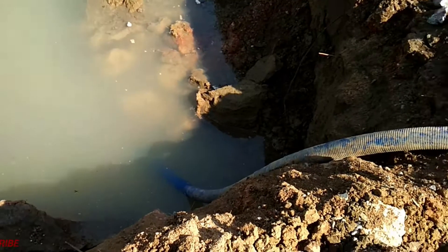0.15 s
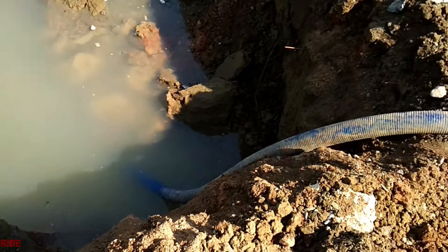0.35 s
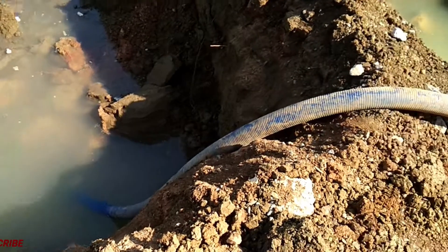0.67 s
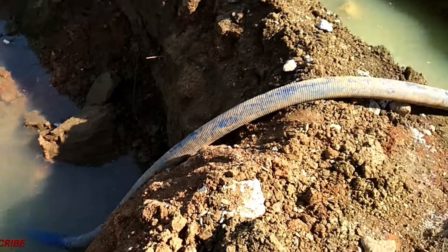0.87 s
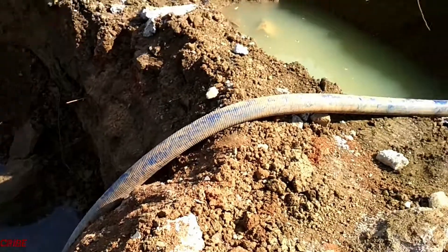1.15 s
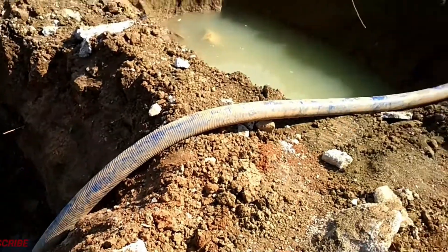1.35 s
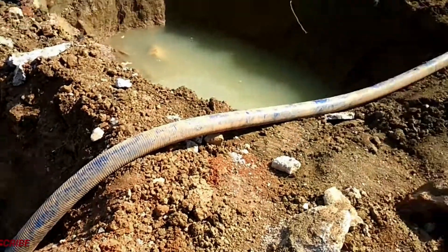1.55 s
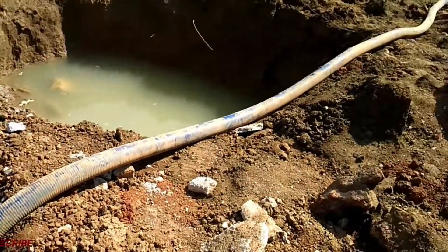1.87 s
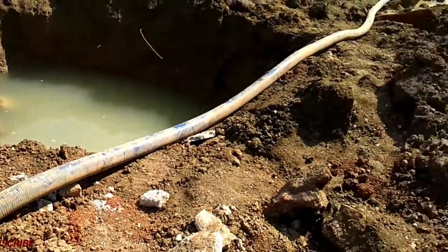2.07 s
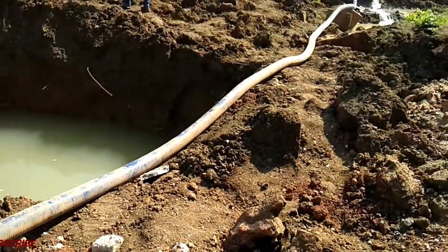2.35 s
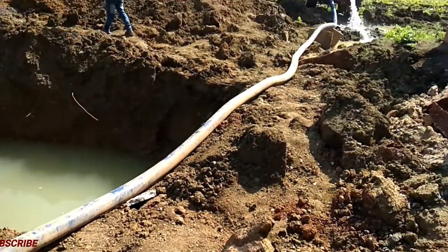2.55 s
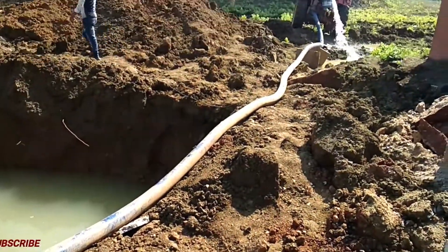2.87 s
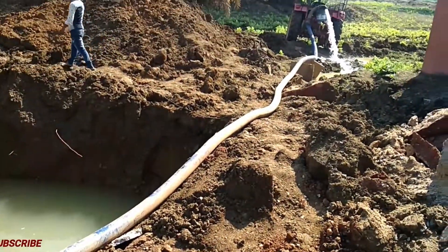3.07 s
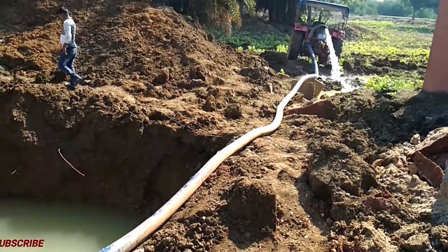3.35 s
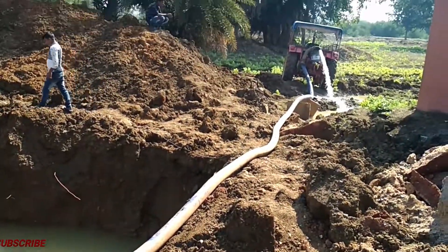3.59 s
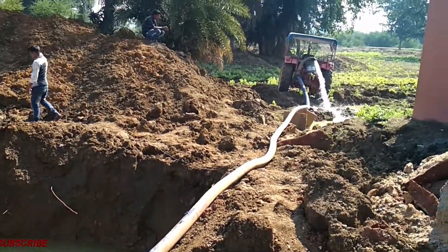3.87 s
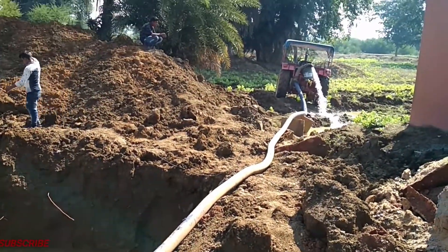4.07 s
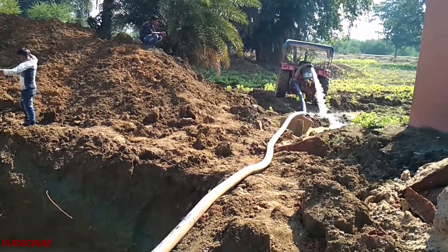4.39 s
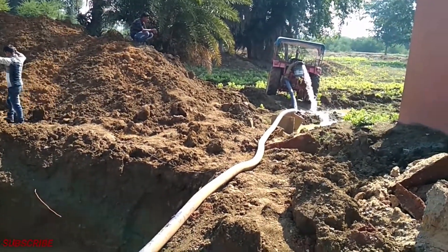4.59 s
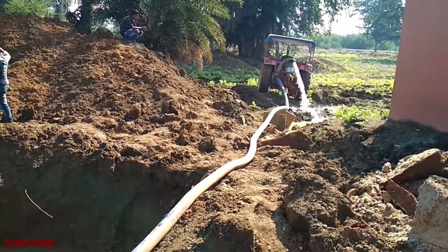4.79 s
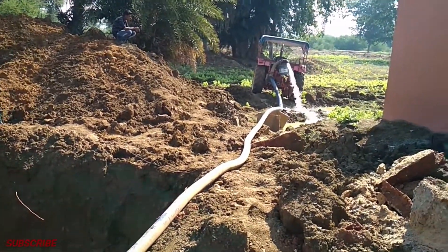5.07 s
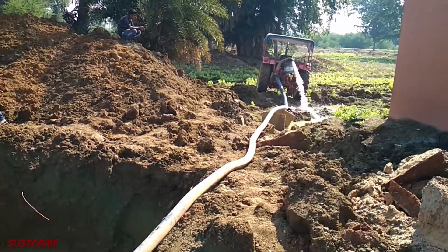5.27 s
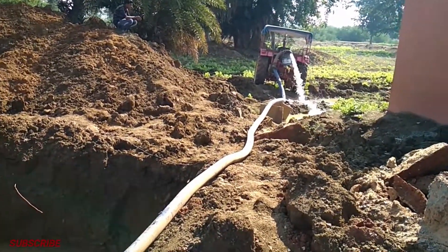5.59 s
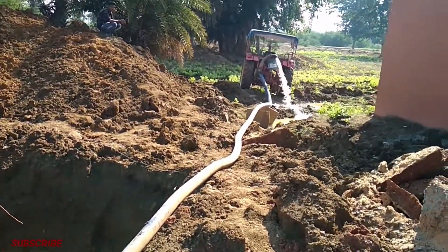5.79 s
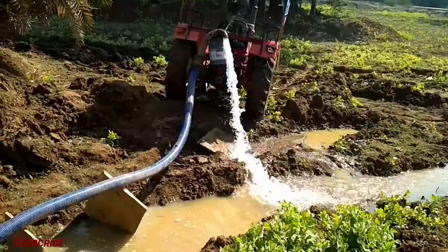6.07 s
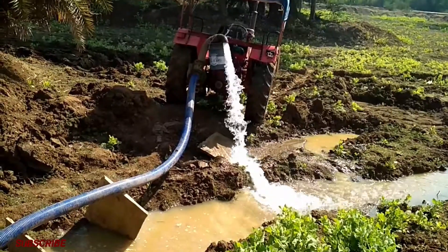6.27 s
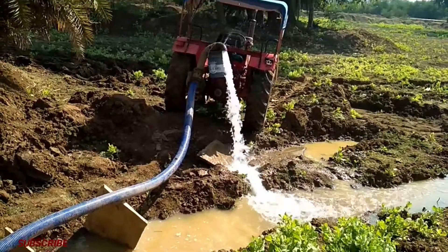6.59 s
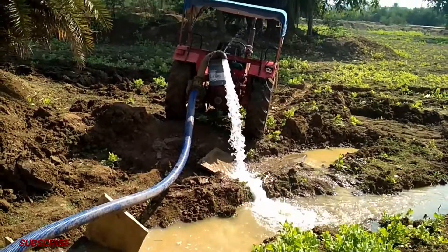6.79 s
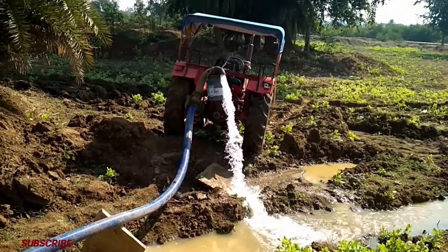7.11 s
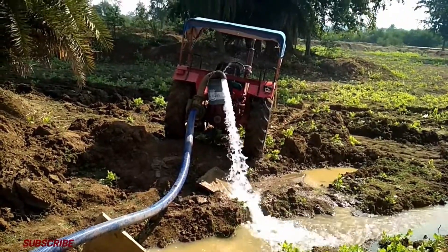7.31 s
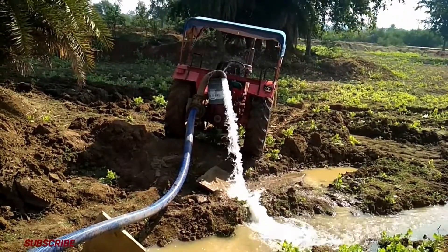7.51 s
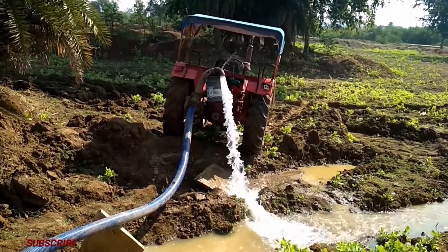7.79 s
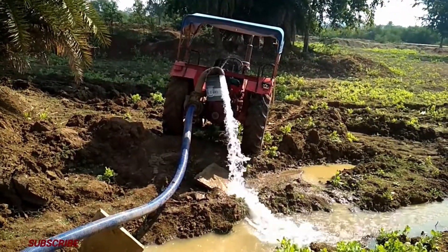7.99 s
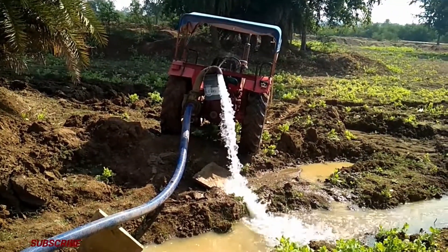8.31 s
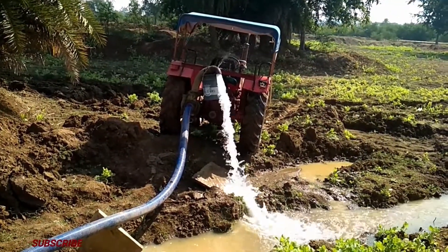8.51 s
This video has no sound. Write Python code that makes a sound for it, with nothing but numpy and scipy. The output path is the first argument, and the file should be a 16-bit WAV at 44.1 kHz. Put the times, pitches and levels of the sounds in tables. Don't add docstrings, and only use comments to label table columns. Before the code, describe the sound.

From the start a diesel tractor engine throbs fast and steadily, about 46 firings a second, a deep droning chug with rattling metal, panel drumming and thin gear whine. A pumped water jet adds a steady, grainy hiss of splashing. From 0 to 2.5 s the handheld stereo microphone swings toward the machine; the sound moves from off to one side to nearly ahead and becomes fuller as it clears the rim. A small coo sounds far off at 1.6 s and a thin beaded whistle at 3.8 s. Tiny dry case clicks occur near 1.1, 2.0, 4.1 and 4.8 s, with light wind puffs throughout. At 5.94 s the view cuts close: engine and water jump up, louder and brighter, with a sharp click at 6.0 s. Low wind buffeting is heavier, strongest at 7.5 s, then eases; engine and water continue to the end at about 8.6 s.

```python
import sys
import numpy as np
from scipy import signal
from scipy.fft import rfft, irfft, next_fast_len
from scipy.io import wavfile
from scipy.ndimage import uniform_filter1d, map_coordinates

SR = 44100
rng = np.random.default_rng(int(sys.argv[2]) if len(sys.argv) > 2 else 0)


def transcribe(u):
    v = np.clip(np.atleast_2d(u).T, -1, 1)
    q = np.round(v * 32767).astype(np.int16)
    wavfile.write(sys.argv[1], SR, q)


def level_to_linear(level):
    exponent = np.asarray(level, float) / 20
    return 10 ** exponent


N = 381465

# (multiple of the cycle rate [1], level [dB])
EXHAUST_FAR = [(1, -24), (2, -25.5), (3, -7.5), (4, -29), (5, -38), (6, 3), (7, -28), (8, -14), (9, 5),
               (10, -25), (11, -39), (12, -7), (13, -19.5), (14, -13.5), (15, -54), (16, -39), (17, -19.5),
               (18, -19), (19, -22), (20, -37), (21, -47), (22, -29), (23, -20.5), (24, -28.5)]
EXHAUST_NEAR = [(1, -27), (2, -37), (3, -4.5), (4, -17), (5, -33), (6, 1.5), (7, -9.5), (8, -16.5), (9, 1),
                (10, -15), (11, -32), (12, -9.5), (13, -18.5), (14, -11.5), (15, -12.5), (16, -11),
                (17, -14), (18, -8), (19, -14.5), (20, -21), (21, -19), (22, -21), (23, -23), (24, -34)]
CYLINDERS = [1, .35, .65]
# (frequency [Hz], density [dB per Hz])
BLOCK_FAR = [(40, -7), (120, -1.5), (200, -4), (293, -8.5), (327, -5.5), (405, -9.5), (425, -4), (747, -8),
             (1410, -13.5), (1630, -5), (3500, -38.5), (4550, -60), (7700, -120)]
BLOCK_NEAR = [(120, -7), (200, -6.5), (368, -12.5), (560, -9), (647, -15.5), (765, -4), (832, -12),
              (949, -7.5), (1250, -16.5), (1830, -12.5), (2390, -24), (3500, -39.5), (4550, -67),
              (7700, -120)]
# (frequency [Hz], far level [dB], near level [dB])
STEADY_TONES = [(322.7, -48.5, -45), (396, -55, -52), (460, -60.5, -45), (953, -56, -44), (1339, -59.5, -47.5),
                (1476, -60, -46), (1197, -55.5, -56), (1589, -45, -69), (1810, -52.5, -73)]
# (frequency [Hz], density [dB per Hz])
SPRAY_FAR = [(1470, -17.5), (2500, -3.5), (2720, -1), (3190, -14), (3450, -11.5), (4080, -12.5), (5330, -9),
             (6610, -16), (8640, -9.5), (9550, -11.5), (11400, -8), (15600, -15)]
SPRAY_NEAR = [(1470, -7), (2500, -6.5), (3050, -9.5), (3290, -6.5), (3900, -13.5), (5290, -8), (6260, -14),
              (6870, -6.5), (7700, -4), (11000, -1.5), (12600, 6.5), (13500, 1), (15600, -8)]
# (time [s], machine off axis [degrees], extra ground path [m])
SWING = [(0, 59, 0.11), (.4, 59, 0.12), (.7, 54, 0.15), (1.0, 53, 0.22), (1.5, 33.7, 0.28),
         (1.9, 29.5, 0.29), (2.15, 16.5, 0.29), (2.5, 9, 0.32), (3.2, 12, 0.31), (4.6, 10.5, .3),
         (4.9, 8.4, .29), (5.94, 4.8, 0.29), (5.947, 5.7, 0.23), (8.65, 5, 0.24)]
# (frequency [Hz], weight [1])
SCATTER = [(100, .05), (900, 0.35), (1500, 1.4), (4000, 2.5), (12000, 3.98)]
# (frequency [Hz], left minus right [dB])
PORTS_FAR = [(60, 6.5), (110, -0.5), (200, 0.5), (380, -2), (700, 1.5), (1290, -4.5), (2380, 0),
             (4400, 3.5), (8120, 6), (15000, -1.5)]
PORTS_NEAR = [(60, 3.5), (110, -0.5), (200, 1), (380, 0.5), (700, 0.5), (1290, -3.5), (2380, -2.5),
              (4400, 17.5), (8120, 9), (15000, -3)]
# (frequency [Hz], density [dB per Hz])
AIR = [(2500, -19.5), (4000, -8.5), (9000, -2.5), (15800, 3)]
# (frequency [Hz], density [dB per Hz])
BUFFET = [(15, -19), (40, -14.5), (90, -2), (150, -7), (220, -17.5), (350, -28.5), (550, -31), (900, -65),
          (1500, -120)]
# (time of peak [s], peak level [dB], half length [s])
GUSTS = [(.46, -40, .07), (1.0, -35, .08), (1.4, -45, 0.092), (1.915, -36, 0.056), (2.3, -47, 0.12),
         (2.63, -33, 0.12), (2.883, -28.5, 0.067), (3.206, -34, 0.16), (3.57, -35, 0.13),
         (4.095, -38.5, .25), (4.905, -36, 0.053), (5.282, -34, 0.084), (5.6, -33.5, .14),
         (5.97, -26.5, 0.078), (6.18, -24, 0.11), (6.46, -22.5, 0.12), (6.755, -25.5, 0.16),
         (7.216, -24.5, 0.19), (7.534, -16.5, 0.064), (7.656, -23, .06), (7.407, -27, .06),
         (7.892, -28, 0.14), (8.12, -29, .07), (8.55, -34, 0.049)]
# (time [s], level [dB], half length [s])
LULLS = [
    (2.3, -3, 0.18),
    (3.75, -2, 0.3),
    (7.95, -3.5, 0.26),
]
# (time [s], peak level [dB], left minus right [dB], frequency [Hz])
TICKS = [
    (1.1235, -36, 0.0, 5090),
    (1.9638, -36, 8, 10300),
    (4.078, -34, 8, 9200),
    (4.8186, -33, -8, 12300),
    (4.857, -31, -17, 13000),
    (4.864, -30, -5, 12600),
    (6.013, -20, 7, 13300),
]
# (start [s], length [s], first frequency [Hz], glide [Hz per s], level [dB])
BIRDS = [
    (3.78, .36, 3350, 249.5, -61.5),
    (1.605, 0.091, 655, -700, -46.5),
]
# (frequency [Hz], step over local level [dB])
COARSE = [(300, -20), (1500, -7), (2600, 3), (4200, 10.5), (15000, 11.5)]

SCENE_CHANGE_S = 5.944
CYCLE_HZ = 15.385
PORT_GAP_M, SOUND_M_PER_S = .138, 343
CASE_MS = 0.277
RIGHT_HIGHER_MS = .11
HIDDEN_M, CLEAR_M = .125, .25
SIDE_LOSS_DB = 6.5
CALM_DB, GUST_EDGE_DB = -61, 7
TRILL_HZ, TRILL_DEPTH = (29.5, 0), .45
CALL_EDGE_S = 0.017
TOP_HZ = 15830

ECHO = (.52, .8, .3)
BENT = (0.22, 1.2, 0.1)
SCATTERED = (.24, 0.32, 0.44)
EXHAUST_DB = (-35, -35.5, -26)
CLATTER_DB = (-40, -38.5, -33)
DRUM_DB = (-15.5, -6.5, -5)
SPLASH_DB = (-50, -53, -40.5)
FIZZ_DB = (-5.5, 1, -4.5)


def unit(x):
    return x / np.sqrt(np.mean(x ** 2) + 1e-20)


def along(points, hz):
    f, v = np.transpose(points)
    return np.interp(np.log(hz + 1), np.log(f + 1), v)


def curves(rows):
    s, *cols = np.transpose(rows)
    return [np.interp(np.arange(N) / SR, s, c) for c in cols]


def wobble(rate, size=1):
    coarse = np.arange(0, N + 64, 64)
    knots = rng.standard_normal(int(N * rate / SR) + 4)
    return np.interp(np.arange(0, N, size), coarse, map_coordinates(knots, [coarse * rate / SR]))


def filtered(x, gain):
    m = next_fast_len(N + 8192)
    return irfft(rfft(x, m) * gain(np.fft.rfftfreq(m, 1 / SR)), m)[..., :N]


def by_shot(far, near):
    return np.where(np.arange(N) < SCENE_CHANGE_S * SR, far, near)


def coloured(x, far, near):
    return by_shot(*[unit(filtered(x, lambda hz: level_to_linear(along(s, hz)))) for s in (far, near)])


def delayed(x, ms):
    return map_coordinates(x, [np.arange(N) - ms * SR / 1000], mode="nearest")


def patchy(depth_db):
    z = signal.stft(rng.standard_normal(N), nperseg=512)[2]
    field = uniform_filter1d(uniform_filter1d(rng.standard_normal(z.shape), 8, 0), 8, 1)
    return unit(signal.istft(z * level_to_linear(depth_db * unit(field)), nperseg=512)[1][:N])


def in_view():
    return np.clip((curves(SWING)[1] - HIDDEN_M) / (CLEAR_M - HIDDEN_M), 0, 1)


def by_view(hidden, clear, near):
    return by_shot(hidden + (clear - hidden) * in_view(), near)


def off_axis():
    return np.sin(np.radians(np.clip(curves(SWING)[0], 0, 90)))


def cycle():
    return np.arange(N) * CYCLE_HZ / SR + .004 * wobble(1.5)


def lulls_db():
    t = np.arange(N) / SR
    return sum(db * np.exp(-((t - s) / half) ** 2) for s, db, half in LULLS)


def exhaust(turns, size=8):
    out, far = 0, by_shot(True, False)[::size]
    for (k, far_db), (_, near_db) in zip(EXHAUST_FAR, EXHAUST_NEAR):
        waver = .8 if k % 3 == 0 else 3.5
        drift = .12 * waver * wobble(6, size)
        phase = 2 * np.pi * k * turns[::size] - .35 * k + .065 * k * k + drift
        level_db = np.where(far, far_db, near_db) + waver * wobble(7, size) - 4.5
        out = out + np.sqrt(2) * level_to_linear(level_db) * np.cos(phase)
    full_rate = signal.resample_poly(out, size, 1)[:N]
    return level_to_linear(by_view(*EXHAUST_DB) + lulls_db()) * full_rate


def steady_tones():
    t = np.arange(N) / SR
    out = 0
    for hz, far_db, near_db in STEADY_TONES:
        level = level_to_linear(by_shot(far_db, near_db) + 3 + 1.8 * wobble(9))
        out = out + level * np.sin(2 * np.pi * hz * t + .3 * wobble(5))
    return out


def clatter(turns):
    firing = 3 * turns
    strength = np.take(CYLINDERS, firing.astype(int) % 3)
    blows = np.diff(np.floor(firing), prepend=0) * strength * level_to_linear(1.0 * wobble(40))
    burst_n = SR // 50
    burst = rng.standard_normal(burst_n) * level_to_linear(-60 * np.arange(burst_n) / SR / 0.054)
    knock = unit(signal.fftconvolve(blows, burst)[:N])
    gate = 1 + 0.3 * strength * np.exp(-(firing % 1) / .5)

    def rattle():
        loose = unit(gate * patchy(depth_db=0.0))
        return coloured(0.25 * knock + loose, BLOCK_FAR, BLOCK_NEAR)

    rattles = np.array([rattle() for _ in range(3)])
    drum = filtered(rattles, lambda hz: 1 / (1 + (hz / 560) ** 6))
    drum_db = by_view(*EXHAUST_DB) + by_view(*DRUM_DB) + 6.5
    return level_to_linear(by_view(*CLATTER_DB) + 5.5) * (rattles - drum) + level_to_linear(drum_db) * drum


def drops(count):
    when, size = rng.random((count, 2)).T
    hits = np.bincount((when * N).astype(int), level_to_linear(-3.5 * np.log(size + .01)), N)
    life = np.arange(SR // 400) / SR
    burst = rng.standard_normal(len(life)) * np.exp(-life / 0.0015)
    return unit(signal.fftconvolve(hits, burst)[:N])


def water():
    splash_db = by_view(*SPLASH_DB) - SIDE_LOSS_DB * off_axis() + .8 * wobble(7)
    fizz_db = by_view(*FIZZ_DB) + .9 * wobble(4)
    surge = level_to_linear(0.36 * wobble(6) + 0.2 * wobble(22) + 1.5 * wobble(60))

    def spray():
        hiss_and_drops = patchy(depth_db=2.0) + .45 * drops(count=5000)
        return coloured(surge * hiss_and_drops, SPRAY_FAR, SPRAY_NEAR)

    jet = np.array([spray() for _ in range(3)])
    splash = filtered(jet, lambda hz: 1 / (1 + (hz / 7500) ** 8))
    fizz = unit(jet - splash)
    return level_to_linear(splash_db) * (level_to_linear(0.3) * unit(splash) + level_to_linear(fizz_db) * fizz)


def ports(tones, rush):
    lag_ms = PORT_GAP_M * off_axis() * 1000 / SOUND_M_PER_S
    echo_ms = curves(SWING)[1] * 1000 / SOUND_M_PER_S
    echo, share = by_view(*ECHO), by_view(*SCATTERED)
    bent = by_view(*BENT) * np.sqrt(off_axis())
    direct = tones + rush[0]
    dull = filtered(direct, lambda hz: 1 / (1 + (hz / 3200) ** 2))
    treble = filtered(direct, lambda hz: 1 / (1 + (2800 / (hz + 1)) ** 4))
    left = direct + echo * delayed(dull, echo_ms)
    left += 0.3 * bent * delayed(treble, 2 * lag_ms + CASE_MS)
    right = delayed(direct - 0.99 * bent * treble, lag_ms)
    right += bent * delayed(treble, lag_ms + CASE_MS)
    right += echo * delayed(dull, echo_ms + .45 * lag_ms + RIGHT_HIGHER_MS)
    scattered = share * filtered(rush[1:], lambda hz: along(SCATTER, hz))
    pair = level_to_linear(-1.5) * np.array([left, right]) + scattered

    def shade(table):
        def gain(hz):
            balance = level_to_linear(along(table, hz) * [[.5], [-.5]])
            return balance / np.sqrt(1 + (0.048 * along(SCATTER, hz)) ** 2)
        return filtered(pair, gain)

    return by_shot(shade(PORTS_FAR), shade(PORTS_NEAR))


def wind():
    t = np.arange(0, N / SR, .005)
    peaks_db = [db - GUST_EDGE_DB * ((t - s) / half) ** 2 for s, db, half in GUSTS]
    gust_db = np.interp(np.arange(N) / SR, t, np.maximum(np.max(peaks_db, axis=0), CALM_DB))
    lumps = level_to_linear(gust_db + 3.6 * np.array([wobble(14), wobble(14)]))
    noise = lumps * (rng.standard_normal((2, N)) + .5 * rng.standard_normal(N))

    def gain(hz):
        return level_to_linear(along(BUFFET, hz) + 23)

    brighter = filtered(level_to_linear(0.5 * (gust_db + 31)) * noise, lambda hz: gain(hz) * hz / (hz + 400))
    return filtered(noise, gain) + brighter


def air():
    return level_to_linear(-62.5) * unit(filtered(rng.standard_normal((2, N)), lambda hz: level_to_linear(along(AIR, hz))))


def ticks():
    out, t = np.zeros((2, N + SR)), np.arange(SR // 100) / SR
    for s, db, pan_db, hz in TICKS:
        click = np.sin(2 * np.pi * hz * t) + 0.63 * rng.standard_normal(len(t))
        click = click * level_to_linear(-60 * t / 0.0034)
        level = level_to_linear(db + 2 + pan_db * np.array([[.5], [-.5]]))
        out[:, round(s * SR):][:, :len(t)] += level * click
    return out[:, :N]


def birds():
    out = np.zeros(N)
    for (s, length, hz, glide, db), trill in zip(BIRDS, TRILL_HZ):
        t = np.arange(round(length * SR)) / SR
        phase = 2 * np.pi * (hz * t + glide * t * t / 2)
        edges = np.clip(np.minimum(t, length - t) / CALL_EDGE_S, 0, 1)
        shape = edges * (1 + TRILL_DEPTH * np.sin(2 * np.pi * trill * t))
        call = np.sin(phase) + 0.09 * np.sin(2 * phase)
        out[round(s * SR):][:len(t)] += level_to_linear(db + 5.5) * shape * call
    return out * level_to_linear(1.2 * wobble(24.8))


def scene():
    turns = cycle()
    machine = ports(exhaust(turns) + steady_tones(), clatter(turns) + water())
    return machine + birds() + wind() + ticks() + air()


def coarse(x, size=1024):
    n, k = np.arange(2 * size), np.arange(size)[:, None]
    window = np.sin(np.pi * (n + .5) / (2 * size))
    cosines = np.cos(np.pi / size * (n + .5 + size / 2) * (k + .5))
    basis = window * cosines * np.sqrt(2 / size)
    count = N // size + 2
    pair = np.pad([x[0] + x[1], x[0] - x[1]], ((0, 0), (size, (count + 1) * size - N - size)))
    blocks = pair.reshape(2, -1, size)
    bins = np.concatenate([blocks[:, :-1], blocks[:, 1:]], axis=2) @ basis.T
    log_power = np.log(np.mean(bins ** 2, axis=0) + 1e-20)
    level = np.exp(uniform_filter1d(log_power, size=120, axis=1) / 2)
    step = level * level_to_linear(along(COARSE, (k[:, 0] + .5) * SR / 2 / size))
    frames = (np.round(bins / step) * step) @ basis
    mid, side = (frames[:, 1:, :size] + frames[:, :-1, size:]).reshape(2, -1)[:, :N]
    return np.array([mid + side, mid - side]) / 2


def band_limit(x):
    return signal.sosfilt(signal.butter(12, 15730, fs=SR, output="sos"), x)


def record(dry):
    mic = filtered(dry, lambda hz: 1 / (1 + (30 / (hz + 1)) ** 2) * (hz < TOP_HZ))
    mix = coarse(mic)
    return band_limit(mix)


dry = scene()
out = record(dry)
transcribe(out)
```